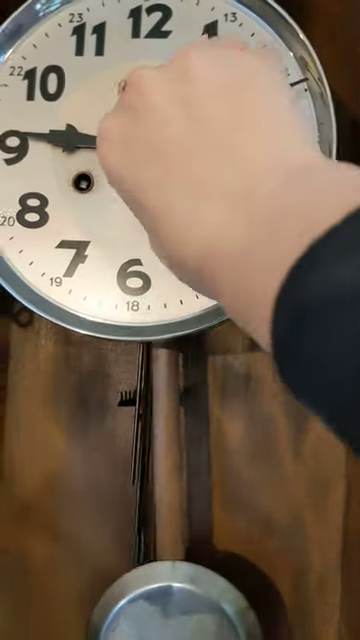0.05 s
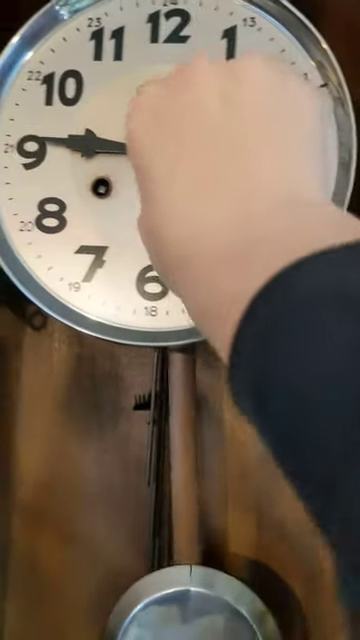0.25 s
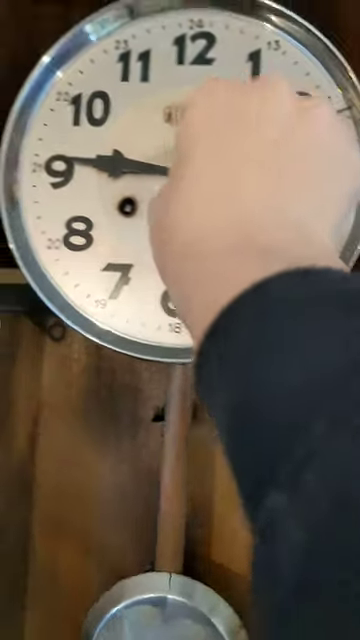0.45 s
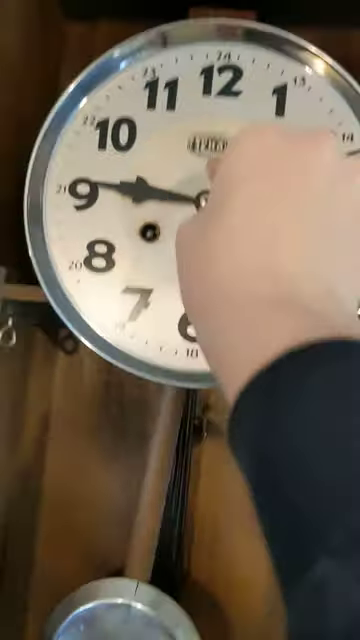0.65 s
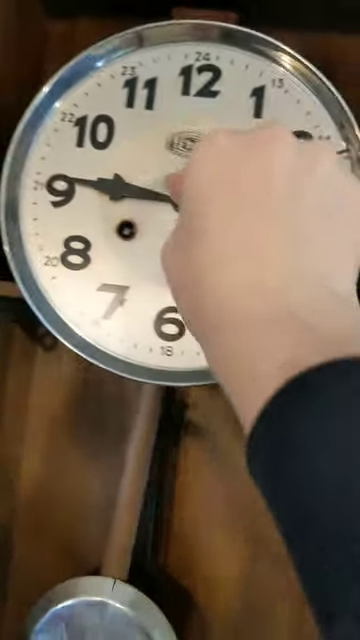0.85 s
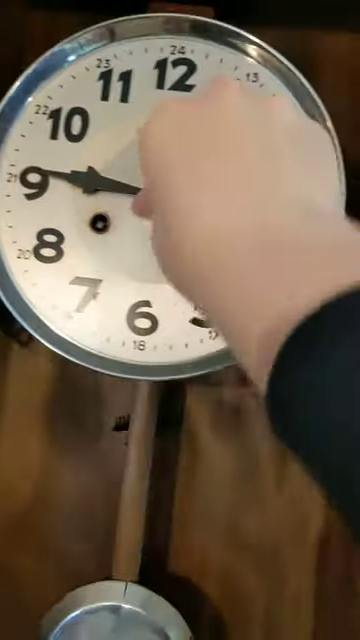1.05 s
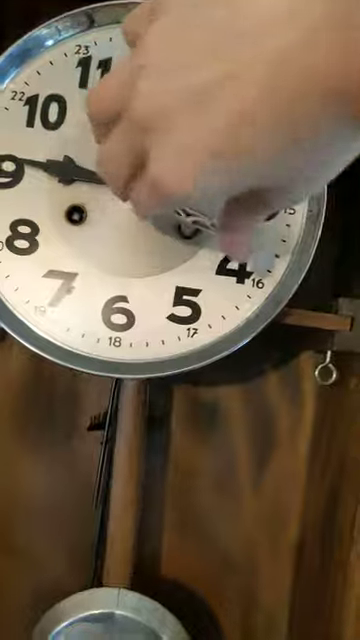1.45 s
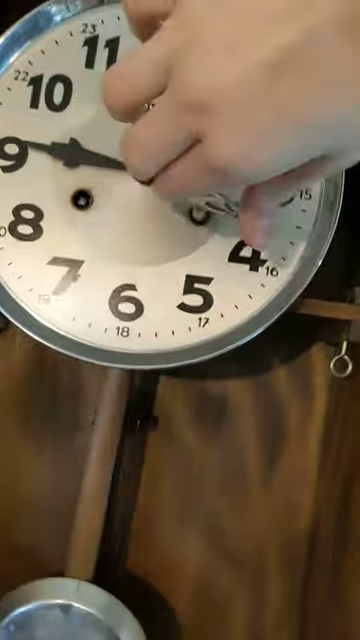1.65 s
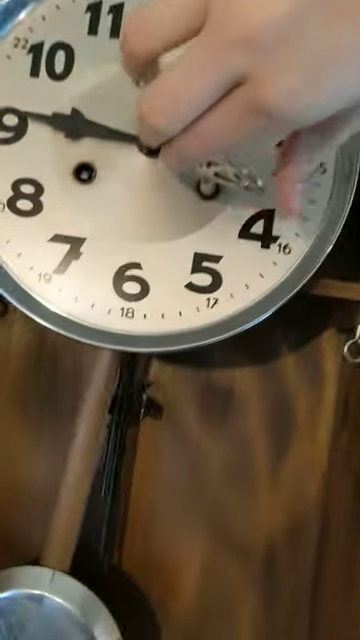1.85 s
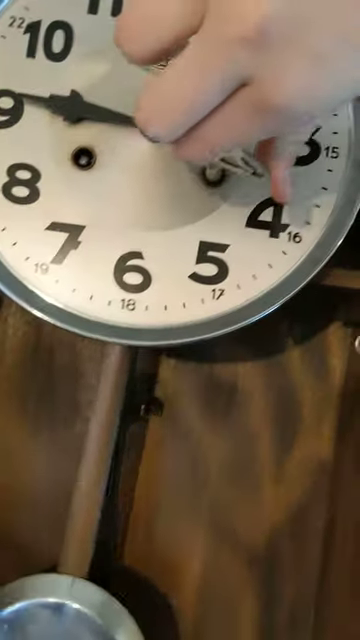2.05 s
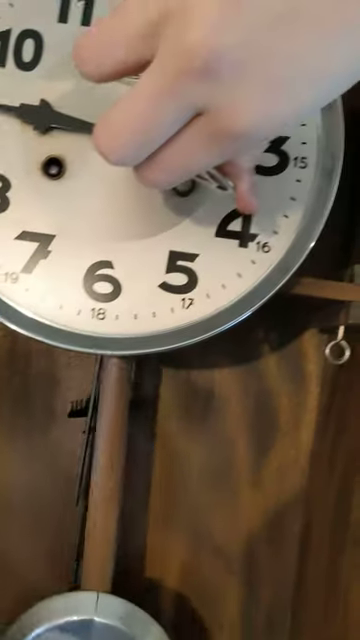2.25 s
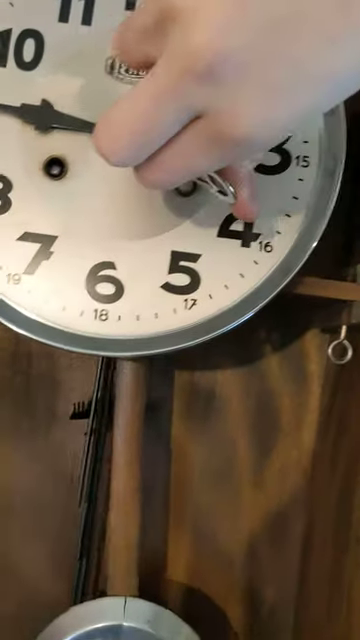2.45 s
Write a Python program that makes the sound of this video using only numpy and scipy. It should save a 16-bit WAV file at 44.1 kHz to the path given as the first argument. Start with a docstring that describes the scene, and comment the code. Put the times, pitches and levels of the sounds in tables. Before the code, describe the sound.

Sharp ratchet clicks of a key winding a wall clock, followed by faint handling taps.

```python
"""A key winds a wooden wall clock, close to a stereo microphone in a small quiet room.
The pawl snaps over the last few ratchet teeth and rings the movement; the key is eased, drawn off
and tapped home again. The hand knocks and rubs on the hollow case, which drones faintly underneath
while the gong rods hum. Snaps, taps and knocks leave a short tail in the room."""
import sys
import numpy as np
from scipy import signal
from scipy.fft import rfft, irfft
from scipy.io import wavfile

SR = 44100
rng = np.random.default_rng(int(sys.argv[2]) if len(sys.argv) > 2 else 0)


def pcm_store(signal):
    """Save signal as 16-bit PCM."""
    levels = np.round(np.clip(np.atleast_2d(signal), -1, 1) * 32767)
    wavfile.write(sys.argv[1], SR, levels.astype(np.int16).T)


N = 114660
T = np.arange(N) / SR
RING_T = np.arange(int(.36 * SR)) / SR  # time within one contact
BAND_EDGES_HZ = 25 * 2 ** (np.arange(39) / 4)
BAND_HZ = np.sqrt(BAND_EDGES_HZ[1:] * BAND_EDGES_HZ[:-1])
METAL_TONE_HZ, WOOD_TONE_HZ = (403, 2060, 9000), (339.7, 600, 1490)  # bass, pivot, treble

# pawl drops: (time [s], level [dB], bass [dB], treble [dB], left minus right of the treble [dB])
PAWL_DROPS = [(-.11, -22, -2, -3, -5.5), (0.2036, -21.7, -3.5, -3.5, -6), (0.357, -24, -.5, -1.5, -6.5),
              (0.5563, -27, 1, 2, -6)]
# clear modes of the movement: (frequency [Hz], level [dB], t60 [s])
MOVEMENT_RING = [(528, -19, .22), (735, -12, .16), (1378, -13, .15), (2135, -10.5, .14), (2358, -7, .16),
                 (3840, -17, .07), (5285, -3, .19), (6480, -6.5, .15), (8500, -7, .04), (12450, -10, .1)]
# its dense, short-lived modes: (frequency [Hz], density [dB per kHz])
MOVEMENT_COLOUR = [(35, -54), (100, -20), (220, -21), (450, -7), (950, -10), (2200, -5), (2950, -13),
                   (4300, -13.5), (5200, -1.5), (7500, 0), (10000, -4.5), (15000, -1), (16500, -7)]
def ratchet(bands):
    """The pawl drops off each tooth and rings the movement, its treble to the microphone's right."""
    out = np.zeros((2, N))
    for s, db, bass_db, treble_db, pan_db in PAWL_DROPS:
        snap = blow(bands, MOVEMENT_RING, MOVEMENT_COLOUR, METAL_TONE_HZ, bass_db, treble_db,
                    attack_s=.0018, hold_s=.002, t60=.03, tail_db=0, pan_db=pan_db)
        add(out, s, from_db(db) * snap)
    return out


# key taps: (time [s], level [dB], bass [dB], treble [dB], ring [dB], ping [Hz], ping level [dB])
KEY_TAPS = [(0.0843, -53, 0, 10, -5, 9000, -20), (.101, -44, -4, -8, -8, 5300, -15),
            (.656, -41, -2.5, 9, -1.5, 5100, -10), (.755, -52.5, 4.5, 6.5, -3, 5100, -13),
            (0.796, -58, 2, -10, -4, 6600, -25), (.856, -55, 17, -40, -2, 6600, -25),
            (.944, -68.5, 27, -23, -5, 6600, -25), (1.2721, -43.5, -14.5, -6.5, 4, 5500, -16),
            (1.816, -42.5, -5, 4, 7, 8390, -15.5), (1.8944, -41.5, 7.5, -0.5, 0, 9950, -10),
            (1.974, -45, 9.5, -13, -3, 6600, -20), (2.431, -41.5, -5, -1, -0.5, 13800, -9)]
# clear modes of the key: (frequency [Hz], level [dB], t60 [s])
KEY_RING = [(738, -8, .12), (925, -7, .12), (1390, -12, .11), (2055, -1, .16), (2330, -11, .08),
            (2660, -8, .12), (3650, -11, .07), (6090, -18, .1), (6620, -15, .06), (10600, -23, .05)]
# its dense, short-lived modes: (frequency [Hz], density [dB per kHz])
KEY_COLOUR = [(35, -45), (100, -18.5), (250, -11), (450, -5), (850, -4), (1400, -6), (2200, -1),
              (3600, -7.5), (5000, -17), (7000, -21), (11000, -26.5), (16000, -32)]
def key_taps(bands):
    """The key taps on the arbor and dial; each struck spot adds a ping of its own."""
    out = np.zeros((2, N))
    for s, db, bass_db, treble_db, ring_db, ping_hz, ping_db in KEY_TAPS:
        modes = KEY_RING + [(ping_hz, ping_db, .064)]
        tap = blow(bands, modes, KEY_COLOUR, METAL_TONE_HZ, bass_db, treble_db,
                   attack_s=.0032, hold_s=.003, t60=.065, tail_db=-1, ring_db=ring_db)
        add(out, s, from_db(db) * tap)
    return out


# soft knocks: (time [s], level [dB], bass [dB], treble [dB])
CASE_KNOCKS = [(0.0594, -40.5, -10, 2.5), (.086, -33, -13, -1.5), (.14, -45.5, -9, -2),
               (.772, -33, -8.5, -8.5), (1.585, -29, 3.5, -12.5), (1.6057, -39.5, 5.5, -16),
               (2.4105, -44.5, -4, -4), (2.503, -52, -5.5, 2.5)]
# clear modes of the case: (frequency [Hz], level [dB], t60 [s])
CASE_RING = [(275, -17, .33), (338, -7, .19), (420, -2, .05), (435, -3, .18), (480, -11, .16),
             (522, -7, .11), (596, -15, .11), (745, -13, .13), (780, -9, .045), (1157, -25, .042)]
# its dense, short-lived modes: (frequency [Hz], density [dB per kHz])
CASE_COLOUR = [(35, -42), (90, -21), (200, -14), (400, -1), (650, -1), (1000, -13), (2200, -19),
               (3500, -37), (8000, -52)]
def case_knocks(bands):
    """The hand knocks softly and rings the hollow wooden case."""
    out = np.zeros((2, N))
    for s, db, bass_db, treble_db in CASE_KNOCKS:
        knock = blow(bands, CASE_RING, CASE_COLOUR, WOOD_TONE_HZ, bass_db, treble_db,
                     attack_s=.01, hold_s=.006, t60=.054, tail_db=-6)
        add(out, s, from_db(db) * knock)
    return out


# thuds through the case: (time [s], level [dB])
CASE_THUDS = [(0.097, -48.5), (.565, -48), (0.784, -48), (0.836, -51), (2.399, -46), (2.47, -52)]
# its lowest modes: (frequency [Hz], level [dB], t60 [s])
CASE_LOW_MODES = [(88, -6, 0.24), (133, -2, .3), (178.1, 1, 0.291)]
def case_thuds(attack_s=.0096):
    """Under the hand's weight the lowest modes of the case swell and die away."""
    ring = sum(from_db(db) * fade(RING_T, t60) * np.sin(2 * np.pi * hz * RING_T)
               for hz, db, t60 in CASE_LOW_MODES)
    thud = rise(attack_s) * ring
    out = np.zeros((2, N))
    for s, db in CASE_THUDS:
        add(out, s, from_db(db) * thud[None])
    return out


# slides on the case: (time [s], length [s], level [dB])
FINGER_SLIDES = [(1.154, 0.036, -53), (1.189, 0.072, -54), (1.40, 0.058, -60.5), (2.13, 0.076, -62.5)]
# their hollow sound: (frequency [Hz], density [dB per kHz])
FINGER_COLOUR = [(200, -20), (330, -2), (470, 0.5), (680, -8.5), (950, -24), (2500, -41), (5000, -50)]
def finger_slides(bands):
    """Each slide of the fingers swells and fades in the hollow case."""
    swell = sum(from_db(db) * np.sin(np.pi * np.clip((T - s) / length, 0, 1))
                for s, length, db in FINGER_SLIDES)
    return swell * hiss(bands, FINGER_COLOUR)


# rubbing of the hand: (time [s], level [dB])
HAND_LEVEL = [(0, -66.5), (.5, -64.5), (.74, -63), (.83, -55.5), (.98, -64.5), (1.13, -64), (1.25, -62.5),
              (1.34, -66), (1.75, -67.5), (2.05, -65.5), (2.3, -76), (2.6, -66)]
# its dull sound: (frequency [Hz], density [dB per kHz])
HAND_COLOUR = [(120, -20.5), (230, -10.5), (280, 4), (370, -2), (480, -0.5), (750, -9), (1100, -17.5),
               (2200, -24), (4000, -40)]
def hand_rub(bands):
    """The hand rubs on the key and case."""
    return level(HAND_LEVEL) * hiss(bands, HAND_COLOUR)


# one stroke of skin: (time [s], level [dB])
SKIN_LEVEL = [(1.25, -100), (1.28, -67.5), (1.35, -59), (1.37, -63), (1.40, -100)]
# its bright sound: (frequency [Hz], density [dB per kHz])
SKIN_COLOUR = [(600, 0), (2000, 4), (4500, -1.5), (7000, 2.5), (10000, -5), (15000, -4.5)]
def dial_brush(bands):
    """Skin brushes briefly over the dial."""
    return level(SKIN_LEVEL) * hiss(bands, SKIN_COLOUR)


# swells of the drone: (time [s], relative level [dB])
DRONE_SWELLS = [(0.0, -60), (0.11, -49.5), (0.17, -59), (0.28, -51.5), (0.54, -71.5), (0.59, -48),
                (0.7, -67), (0.85, -55.5), (1.57, -70.5), (1.61, -57), (1.67, -67), (2.6, -64.5)]
# its low sound: (frequency [Hz], density [dB per kHz])
DRONE_COLOUR = [(30, -41.5), (45, -25.5), (70, -11), (92, 4.5), (110, -10), (135, -11.5), (170, -11),
                (230, -25.5), (500, -53.5)]
def case_drone(bands, gain_db=.5):
    """The hollow case drones faintly under the handling."""
    return from_db(gain_db) * level(DRONE_SWELLS) * hiss(bands, DRONE_COLOUR)


# tones of the rods: (frequency [Hz], level [dB])
ROD_TONES = [(274.5, -2), (324, -8.5)]
# swells of their hum: (time [s], relative level [dB])
ROD_SWELLS = [(0, -68.5), (0.701, -66.5), (1.0, -55), (1.301, -62), (1.55, -72.5), (2.6, -74)]
def gong_rods():
    """The gong rods hum in sympathy, centred in front of the microphone."""
    hum = sum(from_db(db) * np.sin(2 * np.pi * (hz * T + rng.random())) for hz, db in ROD_TONES)
    return level(ROD_SWELLS) * hum


# the small room: (frequency [Hz], tail level [dB], t60 [s], left-right likeness [-1 to 1])
SMALL_ROOM = [(92, 1.5, 0.54, 0.97), (202.3, 1, 0.37, 0.73), (404, -2, 0.24, 0.7), (835, -2.5, 0.27, .3),
              (1985, -10, 0.24, -0.056), (3450, -9.5, .24, -0.14), (6360, -16, .21, -.05),
              (14000, -15, .19, -0.11)]
def blow(bands, modes, colour, tone_hz, bass_db, treble_db, attack_s, hold_s, t60, tail_db,
         pan_db=0, ring_db=0):
    """One contact heard close up: a burst of dense modes, a few that ring on, and the room's tail."""
    tone = list(zip(tone_hz, (bass_db, 0, treble_db)))
    pan = [(6200, 0), (8500, pan_db)]  # only the treble leans to one side
    sides, late_pan_share, scatter_db = np.array([.5, -.5]), .45, 2
    burst_t60 = t60 * at_hz([(4000, 1), (12000, .7)], BAND_HZ)  # the treble dies sooner
    decay_time = np.maximum(RING_T - attack_s - hold_s, 0)
    burst = rise(attack_s) * chatter() * fade(decay_time, burst_t60[:, None])
    room_t60 = at_hz(SMALL_ROOM, BAND_HZ, column=2)
    tail = rise(attack_s=.0041) * fade(RING_T, room_t60[:, None])
    room_db = tail_db + at_hz(SMALL_ROOM, BAND_HZ)
    out = 0
    for envelope, db, pan_share in ((burst, 0, 1), (tail, room_db, late_pan_share)):
        gain = band_gains(colour) * from_db(db + at_hz(tone, BAND_HZ))
        balance = from_db(pan_share * np.outer(at_hz(pan, BAND_HZ), sides))
        out += shaped_noise(bands, envelope, gain[:, None] * balance)
    for hz, db, mode_t60 in modes:
        gain = from_db(db + ring_db + at_hz(tone, hz) + scatter_db * rng.normal())
        balance = from_db(late_pan_share * at_hz(pan, hz) * sides)
        out += gain * balance[:, None] * rise(attack_s) * cluster(hz, mode_t60)
    return out


def chatter(spread_db=2.8, step_s=.0006):
    """Uneven strength of the tiny rebounds within one contact; mean power 1."""
    count = len(RING_T)
    steps = np.interp(RING_T / step_s, np.arange(count), rng.uniform(-1, 1, count))
    gain = from_db(np.sqrt(3) * spread_db * steps)
    return gain / np.sqrt(np.mean(gain ** 2))


# high modes come in close clusters: (frequency [Hz], spread [share of the frequency])
MODE_SPREAD = [(700, 0), (2000, .003), (5300, .016)]
def cluster(hz, t60, count=7):
    """One mode as close partials that start together and beat as they die, in stereo."""
    partials = hz * (1 + at_hz(MODE_SPREAD, hz) * rng.normal(size=(count, 1)))
    envelope = fade(RING_T, t60)
    ring = envelope * np.exp(2j * np.pi * partials * RING_T).sum(axis=0)
    ring *= np.linalg.norm(envelope) / np.linalg.norm(ring)
    phase = rng.choice([-1, 1]) * np.arccos(likeness(hz)) / 2
    return np.imag([ring * np.exp(1j * phase), ring * np.exp(-1j * phase)])


# air of the room: (frequency [Hz], density [dB per kHz])
AIR_COLOUR = [(25, -18.5), (40, -6.5), (60, 3), (100, 2.5), (250, -5.5), (500, -14), (1000, -15),
              (2000, -19.5), (5000, -23.5), (10000, -27.5), (15500, -31.5), (16500, -44)]
def room_tone(bands, level_db=-65):
    """The steady air of the quiet room around the microphone."""
    return from_db(level_db) * hiss(bands, AIR_COLOUR)


def likeness(hz):
    """How alike the microphone's two channels are at a frequency."""
    return np.clip(at_hz(SMALL_ROOM, hz, column=3), -1, 1)


def noise_bands():
    """Quarter-octave bands of stereo noise, rms 1 each: bands x 2 x N."""
    mid, side = rfft(rng.standard_normal((2, N)))
    hz = np.arange(len(mid)) * SR / N
    alike = likeness(hz + 1)
    stereo = np.sqrt(1 + alike) * mid + np.sqrt(1 - alike) * side * np.array([[1], [-1]])
    bands = np.array([irfft(stereo * ((hz >= low) & (hz < high)), N)
                      for low, high in zip(BAND_EDGES_HZ, BAND_EDGES_HZ[1:])])
    return bands / bands.std(axis=(1, 2), keepdims=True)


def shaped_noise(bands, envelope, gains):
    """Noise bands, each given its envelope's shape and energy, mixed to stereo."""
    start = rng.integers(N - len(RING_T))
    noise = bands[:, :, start:start + len(RING_T)] * envelope[:, None]
    even = np.sqrt(np.sum(envelope ** 2, axis=1)[:, None] / np.sum(noise ** 2, axis=2))
    return np.einsum("bc,bct->ct", even * gains, noise)


def hiss(bands, colour):
    """Steady stereo noise of a given colour, rms 1."""
    noise = np.tensordot(band_gains(colour), bands, 1)
    return np.roll(noise, rng.integers(N), axis=1) / noise.std()


def band_gains(colour):
    """Gain of each band from dB per kHz."""
    return from_db(at_hz(colour, BAND_HZ)) * np.sqrt(np.diff(BAND_EDGES_HZ) / 1000)


def from_db(db):
    """Decibels to gain."""
    return 10 ** (np.asarray(db) / 20)


def at_hz(table, hz, column=1):
    """One column of a table, read on a log-frequency axis."""
    table = np.array(table)
    return np.interp(np.log(hz), np.log(table[:, 0]), table[:, column])


def level(rows):
    """Gain over time from (time [s], level [dB]) rows."""
    return from_db(np.interp(T, *np.transpose(rows)))


def rise(attack_s):
    """Linear onset of a contact."""
    return np.minimum(RING_T / attack_s, 1)


def fade(t, t60):
    """Exponential decay, 60 dB in t60 seconds."""
    return np.exp(-np.log(1000) * t / np.maximum(t60, 1e-3))


def add(out, s, sound):
    """Mix a sound in at s seconds; one that began before zero leaves only its tail."""
    start = int(s * SR)
    sound = sound[:, max(-start, 0):]
    start = max(start, 0)
    out[:, start:start + sound.shape[1]] += sound[:, :N - start]


def scene():
    """The clock being wound close to the microphone, the quiet room behind it."""
    bands = noise_bands()
    contacts = ratchet(bands) + key_taps(bands) + case_knocks(bands) + case_thuds()
    friction = finger_slides(bands) + hand_rub(bands) + dial_brush(bands)
    background = case_drone(bands) + gong_rods() + room_tone(bands)
    return contacts + friction + background


def record(dry, cutoff_hz=16100):
    """A steep low-pass cuts the top of the microphone's signal."""
    return signal.sosfilt(signal.ellip(10, .2, 80, cutoff_hz, fs=SR, output="sos"), dry)


dry = scene()
out = record(dry)
pcm_store(out)
```